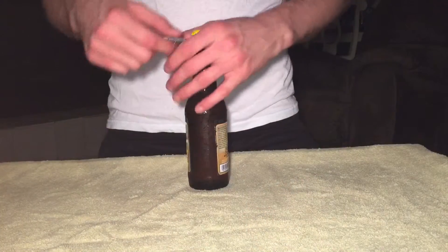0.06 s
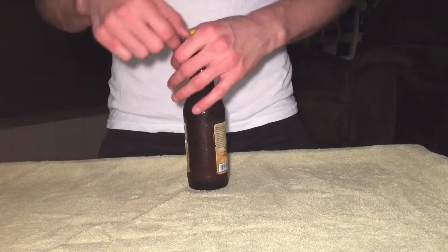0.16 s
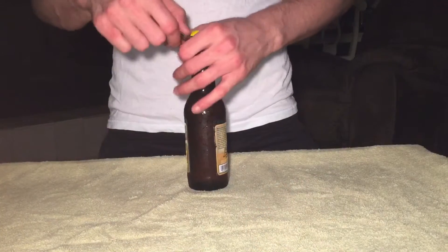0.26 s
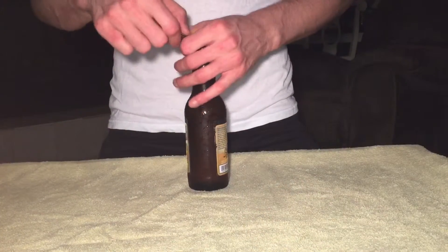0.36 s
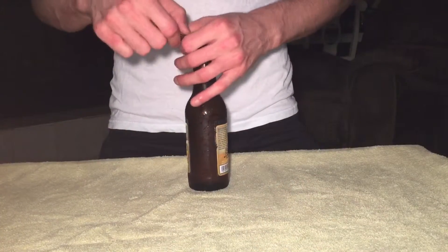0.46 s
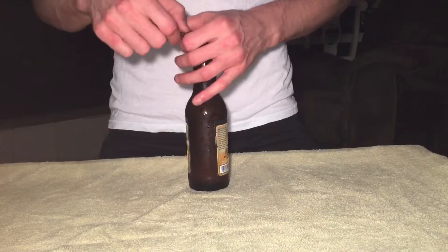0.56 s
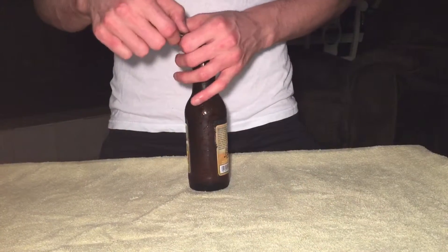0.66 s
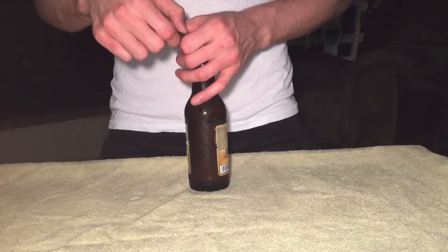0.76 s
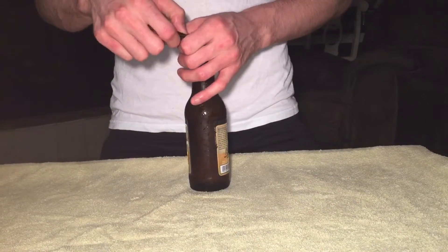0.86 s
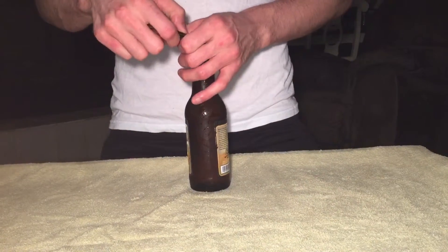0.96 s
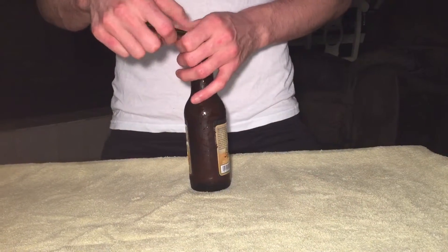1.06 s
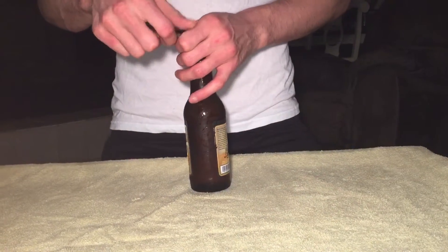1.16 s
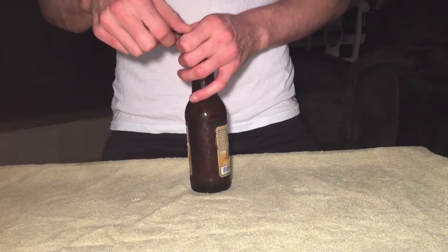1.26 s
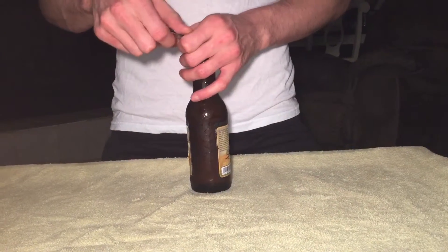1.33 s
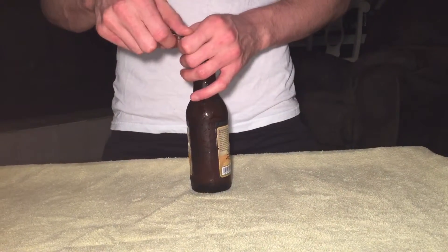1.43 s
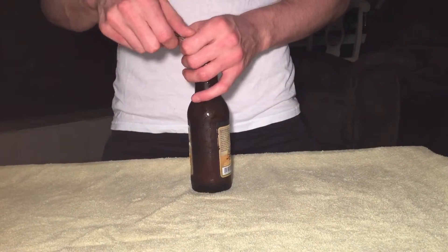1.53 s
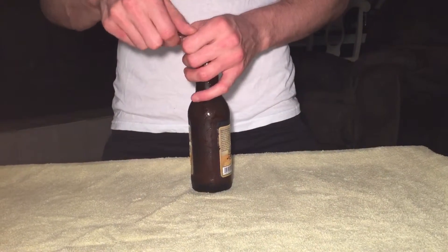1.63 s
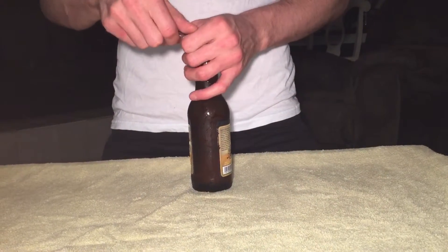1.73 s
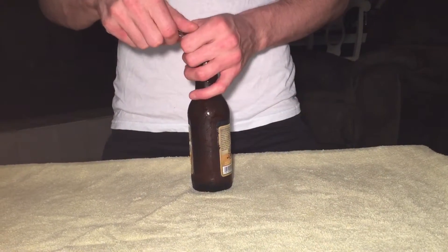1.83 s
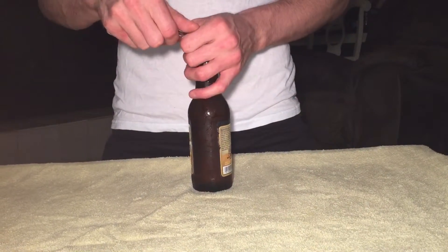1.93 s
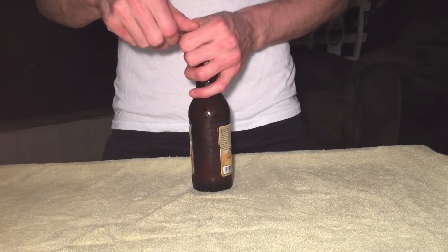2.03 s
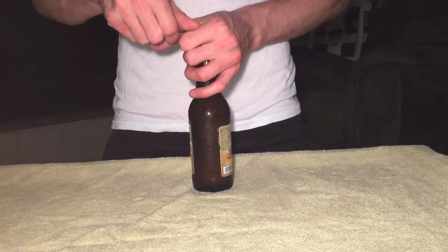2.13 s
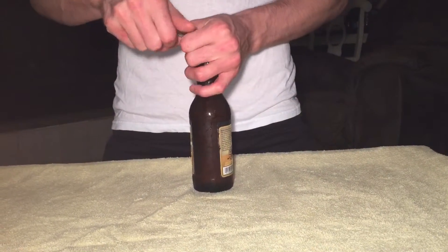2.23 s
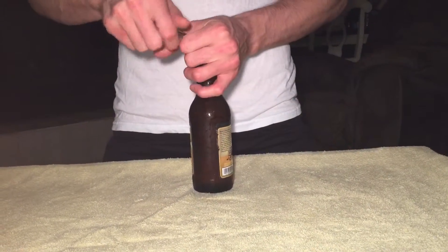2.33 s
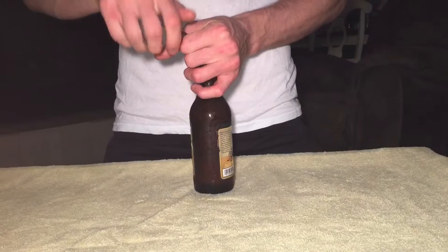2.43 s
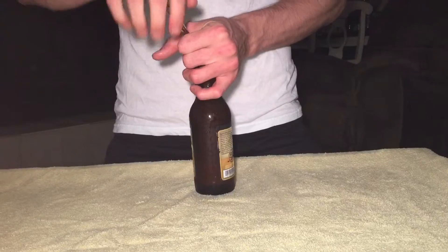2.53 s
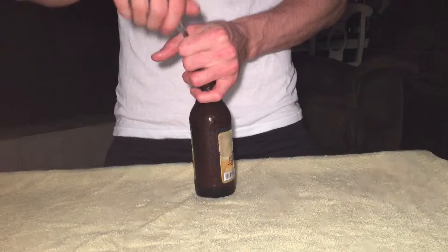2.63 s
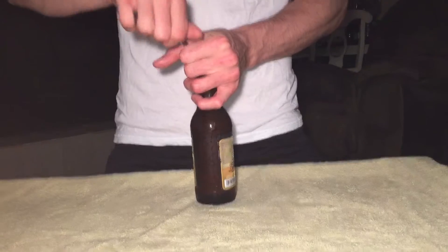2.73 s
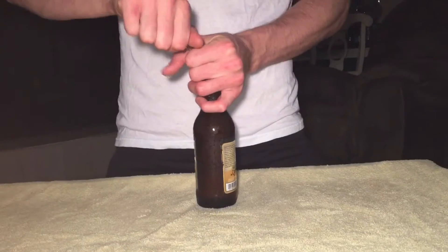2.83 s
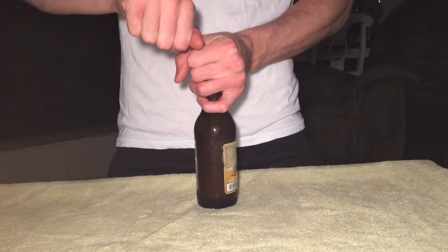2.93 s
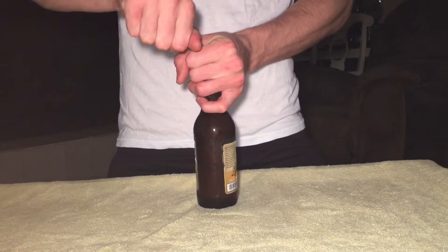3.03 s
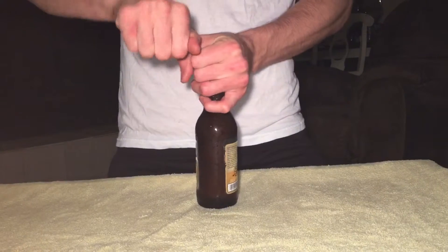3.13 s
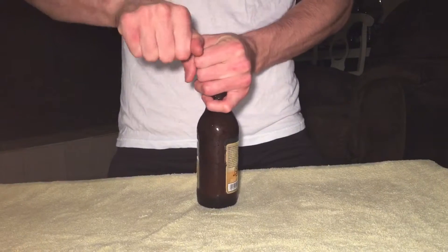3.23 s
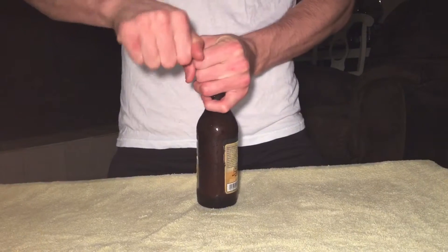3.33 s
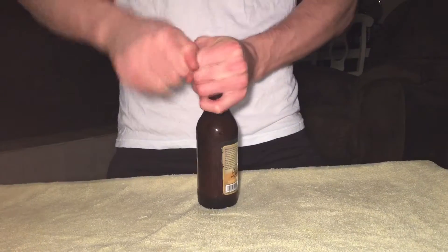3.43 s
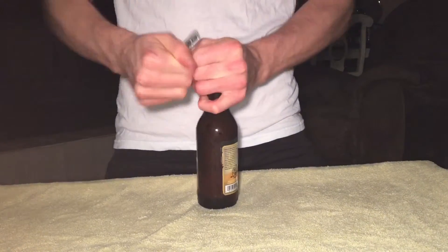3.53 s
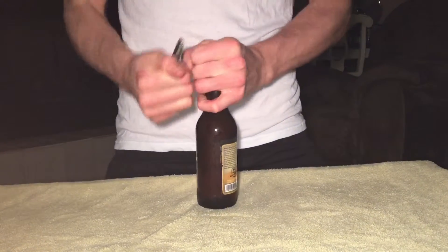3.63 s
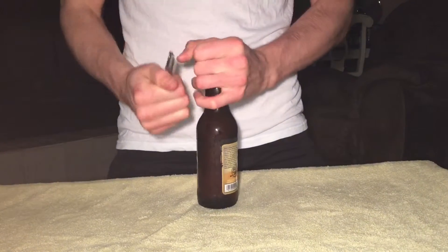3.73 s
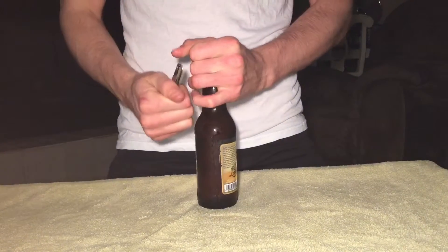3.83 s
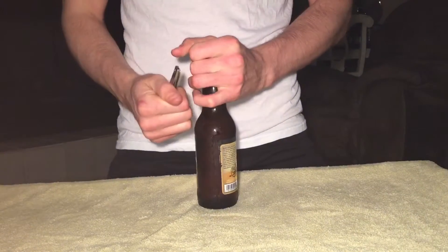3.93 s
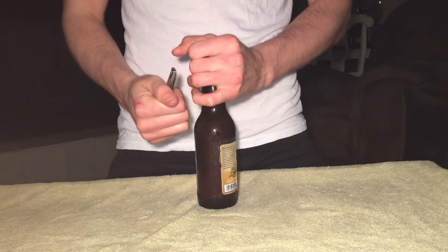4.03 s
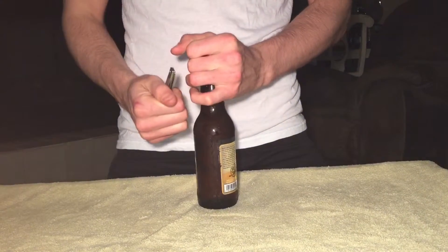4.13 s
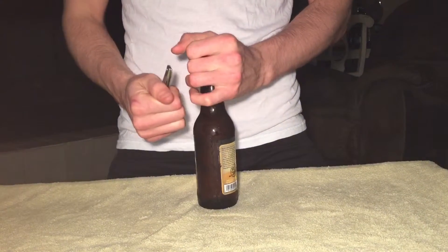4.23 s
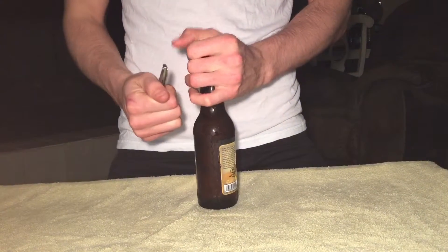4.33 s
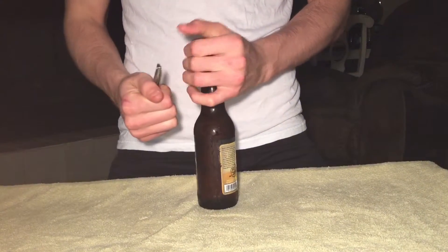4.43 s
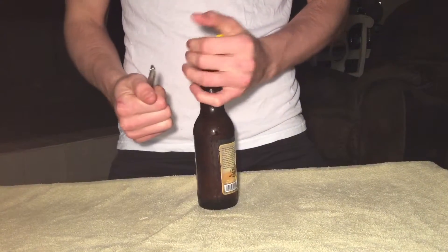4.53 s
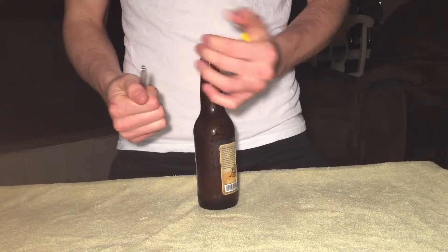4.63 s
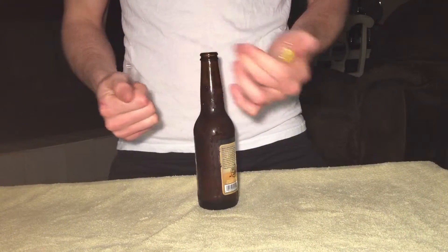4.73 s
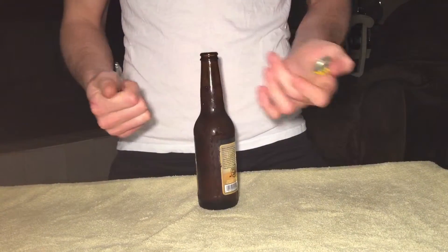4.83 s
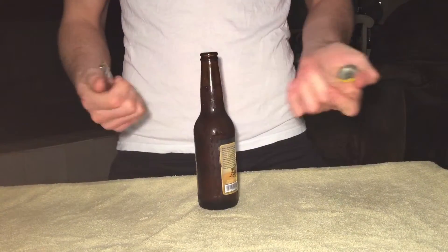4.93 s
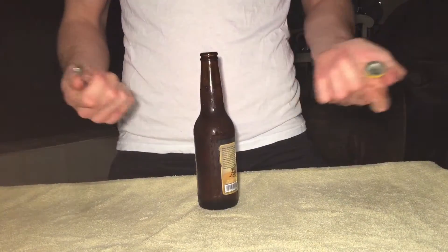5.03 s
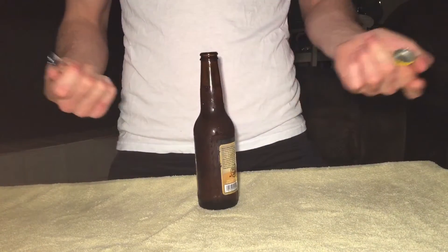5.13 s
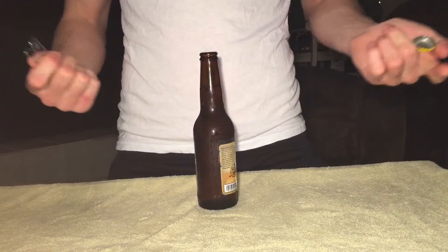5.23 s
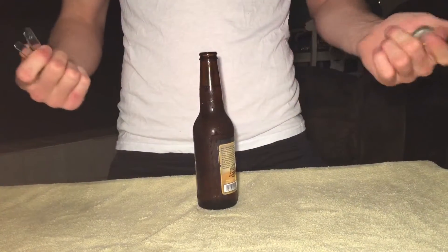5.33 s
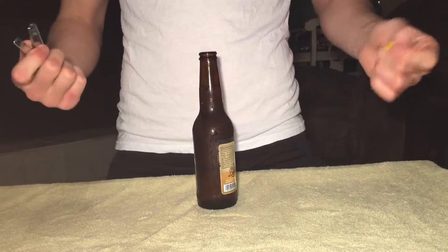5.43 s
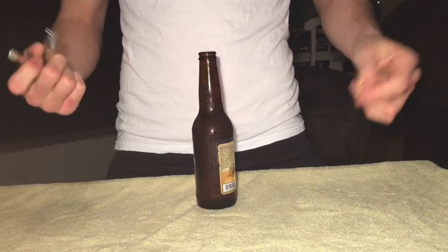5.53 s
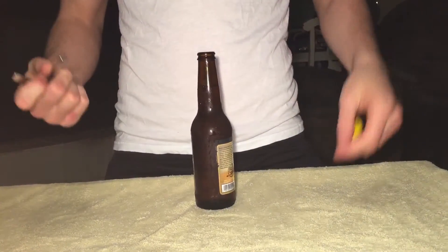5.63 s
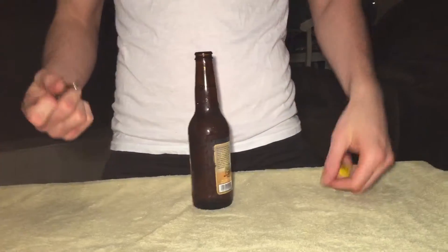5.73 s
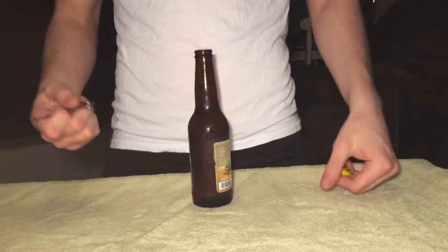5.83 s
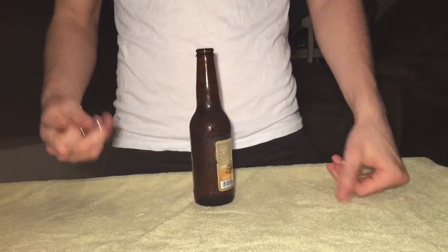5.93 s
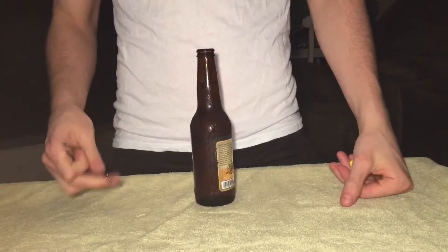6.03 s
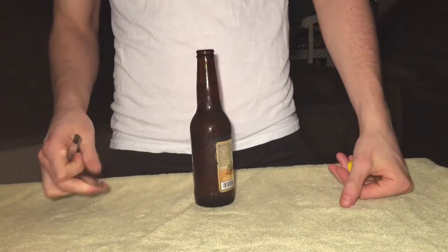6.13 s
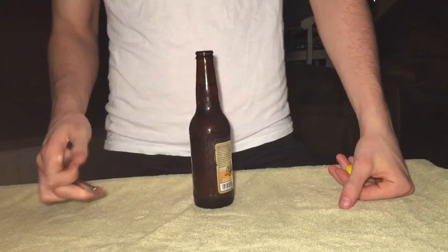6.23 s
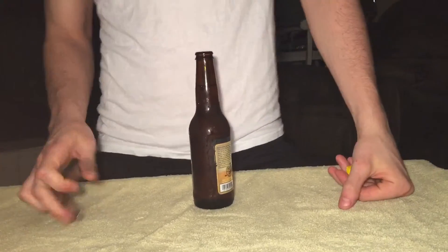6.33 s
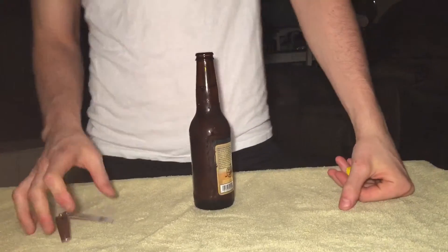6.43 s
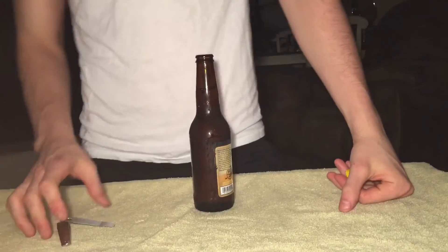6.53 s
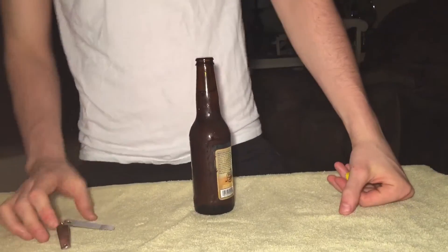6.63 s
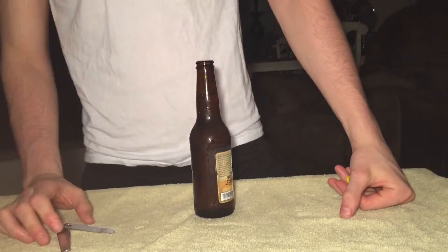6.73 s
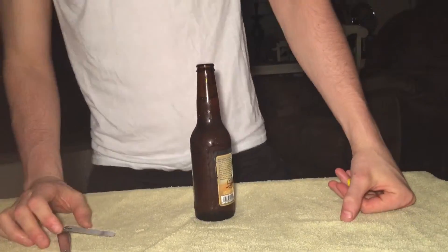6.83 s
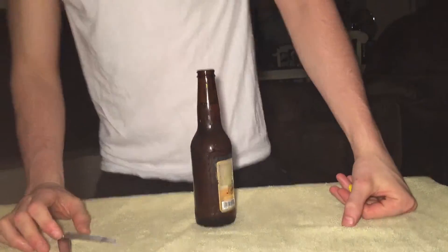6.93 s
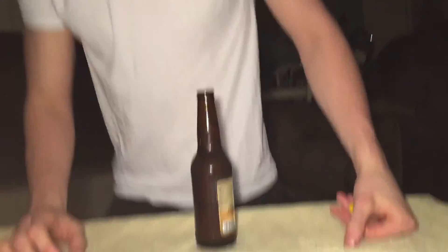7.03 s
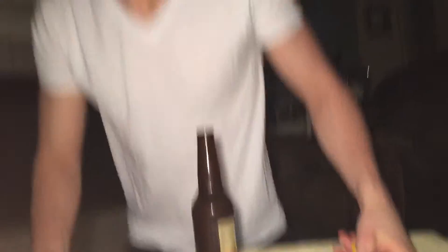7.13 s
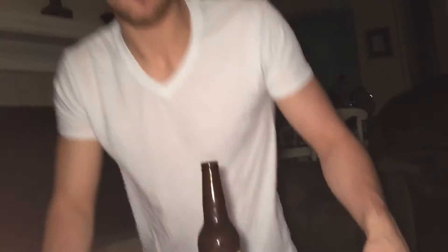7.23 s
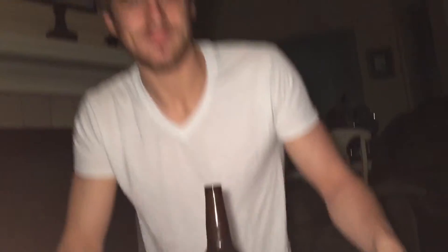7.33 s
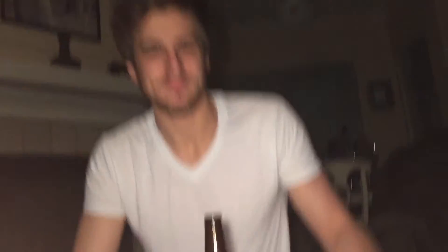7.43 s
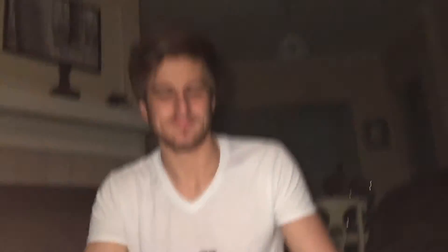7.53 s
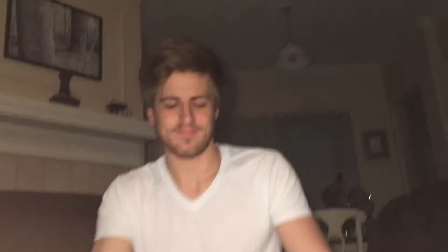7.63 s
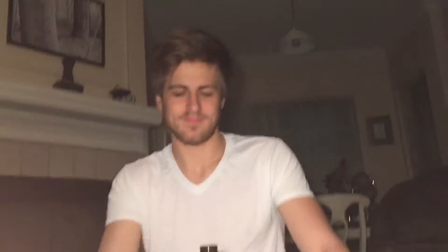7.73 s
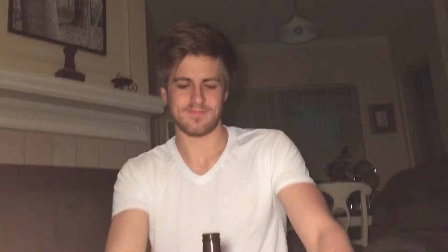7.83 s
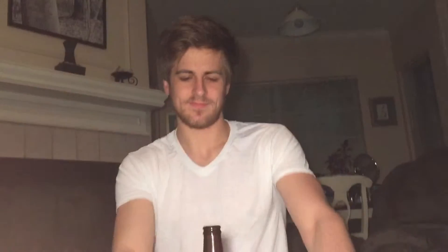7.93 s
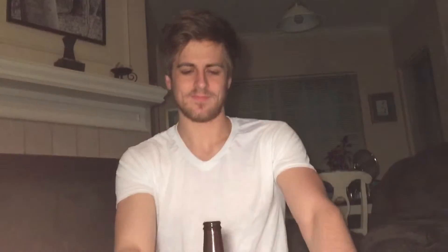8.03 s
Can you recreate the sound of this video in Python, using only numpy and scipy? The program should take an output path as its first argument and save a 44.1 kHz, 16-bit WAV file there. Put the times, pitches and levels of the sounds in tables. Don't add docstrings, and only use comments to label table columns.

```python
import sys
import numpy as np
from scipy import signal
from scipy.fft import rfft, irfft, next_fast_len
from scipy.io import wavfile
from scipy.ndimage import map_coordinates

SR = 44100
rng = np.random.default_rng(int(sys.argv[2]) if len(sys.argv) > 2 else 0)


def generate_wav(sig):
    pcm = np.round(np.clip(np.atleast_2d(sig).T, -1, 1) * 32767).astype(np.int16)
    wavfile.write(sys.argv[1], SR, pcm)


def gain_from_decibels(decibels):
    exponent = np.asarray(decibels, float) / 20
    return 10 ** exponent


N = 355645
LIFE = np.arange(SR // 4) / SR

# (frequency [Hz], rms level [dB], unsteadiness [dB])
HUM = [(58.7, -47, -1), (121, -60.5, 3.5), (179.5, -72, 4.5), (238.9, -84.5, 3.5), (290, -69, 6),
       (405, -75, 5.5), (470.5, -66.5, -0.5), (610, -85, 5.5)]
# (frequency [Hz], density [dB per Hz])
AIR_SPECTRUM = [(12, -34), (20, -6), (44, -8.5), (71, -9), (102, -11.5), (212, -20.5), (289, -18),
                (361, -24), (465, -22.5), (535, -26), (772, -32), (966, -32), (4930, -43.5), (15200, -50.5),
                (16500, -69)]
# (frequency [Hz], T60 [s])
ROOM_DECAY = [(150, 0.49), (1000, 0.44), (4000, 0.34), (9000, .27), (15000, 0.12)]
# (delay [s], level [dB])
ECHOES = [(.0045, -15), (.009, -21), (.014, -20), (.0205, -25), (.028, -26)]

# (time [s], peak level [dB], push length [s])
THUMPS = [(3.53, -11.5, 0.0034), (3.535, -14.5, 0.0033), (3.548, -12.5, 0.0031), (3.558, -15.5, 0.0062),
          (4.364, -49.5, 0.012), (5.809, -40.5, 0.0068), (5.874, -29, 0.0055), (5.938, -44.5, 0.0029),
          (6.042, -29.5, 0.007), (6.112, -50, .009), (6.208, -49, .01), (6.5319, -19.5, 0.00082),
          (6.5412, -12, 0.0016), (6.555, -27, 0.00096), (6.857, -34, 0.014), (7.5605, -27, 0.0044),
          (7.589, -34.5, 0.004), (7.609, -40, 0.005), (7.638, -33.5, 0.0036), (7.735, -37, 0.0069)]
# (frequency [Hz], level [dB], T60 [s])
TABLE_MODES = [(45, -17.5, .1), (87, -9, .15), (113.3, -7, 0.36), (151.5, -2.5, .1), (174.7, -9, 0.055),
               (217, -9.5, 0.06), (237.5, -7, .1), (366, -16.5, 0.23), (462, -19, .07),
               (598.6, -24.5, 0.055), (647, -28.5, .05), (945, -26.5, 0.046)]
# (time [s], peak level [dB])
THUDS = [
    (3.531, -31),
    (6.533, -39),
    (6.543, -32),
    (7.56, -49.5),
    (7.6, -47.5),
]
# (frequency [Hz], density [dB per Hz])
THUD_SPECTRUM = [(60, -32), (120, -7.5), (220, -4.5), (370, -1.5), (480, -2), (700, -14.5), (1200, -36.5)]
# (time [s], peak level [dB])
CREAKS = [(7.5662, -42.5), (7.579, -48), (7.675, -41), (7.6854, -39.5), (7.706, -53), (7.762, -44),
          (7.922, -44), (7.9295, -28.5), (7.9335, -34), (7.984, -35.5), (7.9985, -34), (8.0155, -37)]
# (frequency [Hz], density [dB per Hz])
CREAK_SPECTRUM = [(500, -37), (1200, -7.5), (2000, -0.5), (3000, -3), (4200, -8.5), (5500, -31),
                  (9000, -29), (14000, -41.5)]

# (time at full speed [s], level [dB], held [s])
SOFA_RUBS = [
    (7.69, -59, .004),
    (7.755, -59, .01),
    (7.87, -71, .19),
]
# (time at full speed [s], level [dB], held [s])
SLEEVE_RUBS = [
    (6.83, -61.5, 0.00984),
    (6.97, -67.5, .004),
    (7.05, -72, 0.27),
    (7.58, -59.5, 0.0037),
    (7.75, -66.5, .004),
]
# (frequency [Hz], density [dB per Hz])
SOFA_SPECTRUM = [(700, -13), (1500, 6.5), (3500, 4.5), (5000, 1), (7000, -1.5), (12000, -9), (16000, -12),
                 (17000, -59)]
# (frequency [Hz], density [dB per Hz])
SLEEVE_SPECTRUM = [(200, -25), (400, 2.5), (1000, 1.5), (2500, -4), (3500, -10.5), (6000, -14),
                   (12000, -43.5)]

# (time of fullest flow [s], level [dB], held [s])
LEAK = [
    (3.504, -33, .004),
]
# (frequency [Hz], density [dB per Hz])
GAS_SPECTRUM = [(590, -57.5), (1000, -27.5), (2810, 3), (3550, -3.5), (4180, -9), (4490, -11), (7260, -3.5),
                (9400, -2), (15000, -7), (15900, -11), (16500, -30.5)]

# (time [s], peak level [dB])
POPS = [
    (3.5284, -1),
    (3.5386, -8.5),
    (3.5467, -11),
]
# (time [s], peak level [dB])
CAP_SNAPS = [(.921, -56.5), (.935, -63), (1.034, -62), (1.042, -59), (1.0482, -52), (2.32, -46),
             (4.4294, -67), (4.477, -61), (5.2594, -63.5), (5.3093, -22), (5.3112, -10), (5.3133, -25),
             (5.6229, -48), (5.6594, -63), (5.7894, -65.5)]
# (time [s], peak level [dB])
DROPS = [
    (6.5315, -31.5),
    (6.535, -28),
    (6.542, -24),
    (6.5484, -32.5),
]
# (time [s], peak level [dB])
KNOCKS = [
    (.2583, -31),
    (.46, -46),
    (.6, -49),
    (1.2534, -42),
    (1.2604, -40.5),
    (6.5315, -25.5),
    (6.542, -29),
    (7.56, -49),
]
# (frequency [Hz], density [dB per Hz])
POP_SPECTRUM = [(500, -27), (750, -10.5), (1900, -21.5), (2700, -5), (3300, -3.5), (4100, -10),
                (6000, -11.5), (8000, -16.5), (9500, -18.5), (10500, -17), (11500, -21), (15400, -25.5),
                (16500, -44.5)]
CAP_SPECTRUM = [(900, -62), (1450, -19), (2000, -30), (3000, -13.5), (4000, -7.5), (5000, -15.5),
                (5800, -20), (6700, -3.5), (7600, -4), (8600, -12.5), (10400, -0.5), (15000, -2),
                (16500, -21.5)]
DROP_SPECTRUM = [(1470, -47), (2500, -15.5), (3950, -21), (5420, -12), (6350, -4), (7150, -19), (8370, -11),
                 (10300, -15.5), (11700, -6), (15500, -19.5), (16500, -33.5)]
KNOCK_SPECTRUM = [(300, -30), (600, 0), (950, -1), (1400, -4.5), (2200, -10.5), (3500, -34), (8000, -60.5)]

# (time [s], peak level [dB])
LEVER_TAPS = [
    (3.0817, -31),
]
# (frequency [Hz], level [dB], T60 [s])
LEVER_MODES = [(1854, -15, 0.16), (1910, -15, .1), (2720, -8, 0.0118), (3350, -0.5, 0.01),
               (3560, -5.5, 0.012), (3860, -14, 0.0103), (4653, -18, .035)]
# (time [s], peak level [dB])
JAW_TAPS = [
    (1.0412, -44.5),
]
# (frequency [Hz], level [dB], T60 [s])
JAW_MODES = [(3510, 3.5, 0.019), (3500, -3, 0.017)]
# (time [s], peak level [dB])
CROWN_TAPS = [
    (3.5285, -7),
    (3.538, -16),
    (3.546, -10.5),
]
# (frequency [Hz], level [dB], T60 [s])
CROWN_MODES = [(1103, -26.5, 0.25), (2780, -12.5, 0.008), (2753, -10.5, 0.022), (3020, -9, .012),
               (3180, -8.5, 0.03), (3250, -11, 0.021), (4730, -18, .025), (11330, -16.5, 0.023)]
# (time [s], peak level [dB])
LOOSE_TAPS = [
    (4.434, -48),
    (4.475, -52.5),
]
# (frequency [Hz], level [dB], T60 [s])
LOOSE_MODES = [(1062, -18, 0.21), (3360, 0, 0.075), (3270, -2, .06), (5470, -18, .02), (8450, -20, .02)]
# (time [s], peak level [dB])
UNCORK = [
    (3.529, -21),
]
# (frequency [Hz], level [dB], T60 [s])
HOLLOW_MODES = [(218, 0, 0.14), (172, -2.5, 0.16), (710, -19, 0.071), (881.6, -17.5, .06)]

# (frequency [Hz], level [dB], T60 [s])
NECK = [(1666, -35.5, 0.17), (1812, -32, 0.084), (2450, -27, 0.057), (2923, -6.5, 0.017),
        (3118, -8.5, 0.034), (3198, -1, .035), (3263, -7, 0.041), (3333, -5.5, .025), (3854, -16, 0.011),
        (4215, -25.5, .13)]
SHOULDER = [(1112, -23, .15), (4650, -0.5, 0.076), (4750, -7.5, 0.06)]
LIP = [(5260, -17, 0.27), (5890, -16, 0.36), (5930, -22, .1), (6300, 8, 0.075)]
HIGH = [(7590, -17, 0.13), (8370, -14, 0.027), (8790, -6.5, 0.073), (9250, -11, 0.027), (9520, -10, 0.079),
        (11200, -15.5, 0.021), (12510, -17, 0.042), (13800, -11, .02), (15000, -16, .02)]
# (time [s], neck level [dB], shoulder level [dB], lip level [dB], high-mode level [dB])
KNICKS = [
    (0.258, -8, -30.5, -24.5, -23.5),
    (.3558, -38, -30, -47, -35),
    (0.4594, -24, -39.5, -47, -38),
    (1.24, -53.5, -77.5, -68, -76),
]
TOUCHES = [(.298, -47, -51, -55, -62), (.325, -47, -67, -65, -48), (.585, -37, -70, -69, -65),
           (.5913, -31, -52, -49, -44), (0.7194, -39.5, -57.5, -70, -63), (.934, -59, -54, -67.5, -74.5),
           (1.103, -32.5, -47.5, -57, -54), (1.2067, -45, -76, -84, -75), (1.2534, -37, -57, -64, -61),
           (1.2601, -31.5, -46.5, -63, -62), (1.311, -57, -76, -83, -78),
           (1.6709, -26.5, -37.5, -42.5, -50.5), (1.859, -45.5, -48, -53.5, -53),
           (2.3199, -53, -58, -80, -54), (2.5989, -61, -75, -90, -71)]
SLIDES = [
    (.234, -54, -102, -76, -66),
    (0.6064, -30.5, -33.5, -36.5, -35),
    (.926, -40, -73, -71, -68.5),
    (1.222, -50, -65, -77, -80),
]
# (frequency [Hz], density [dB per Hz])
GRIT_SPECTRUM = [(700, -30), (1500, -11), (2500, -1), (5000, 0.5), (9000, -2), (11000, -5.5), (14500, -7.5),
                 (15800, -14), (16500, -46.5)]
# (frequency [Hz], density [dB per Hz])
CLATTER_SPECTRUM = [(900, -30), (1700, -20), (2500, -8), (3200, 7), (4000, -3.5), (5500, -10.5),
                    (7000, -19), (10000, -35)]


def unit(x):
    return x / np.sqrt(np.mean(x ** 2) + 1e-20)


def along(points, hz):
    f, v = np.transpose(points)
    return np.interp(np.log(hz + 1), np.log(f + 1), v)


def coloured(spectrum, size):
    fast = next_fast_len(size)
    gain = gain_from_decibels(along(spectrum, np.fft.rfftfreq(fast, 1 / SR)))
    noise = rfft(rng.standard_normal(fast))
    return unit(irfft(noise * gain, fast)[:size])


def wobble(rate):
    knots = rng.standard_normal(int(N * rate / SR) + 4)
    return map_coordinates(knots, [np.arange(N) * rate / SR])


def add(track, s, sound):
    part = track[round(s * SR):][:len(sound)]
    part += sound[:len(part)]


def ring(modes, scatter_db, rise=0):
    hz, db, t60 = np.transpose(modes)[:, :, None]
    chance = rng.standard_normal((len(modes), 3, 1))
    swell = np.clip(LIFE / (rise + 2.0 / hz), 0, 1)
    decay_db = 60 * np.maximum(LIFE - rise, 0) / t60
    envelope = swell * gain_from_decibels(db + scatter_db * chance[:, 0] - decay_db)
    pitch = hz * (1 + 0.0034 * chance[:, 1])
    phase = chance[:, 2] * np.clip(rise * 500 - 1, 0, 2)
    return np.sum(envelope * np.sin(2 * np.pi * pitch * LIFE + phase), axis=0)


def strokes(rows, swell_db, die_db):
    t = np.arange(N) / SR
    gain = np.zeros(N)
    for s, db, held in rows:
        before, after = np.maximum(s - t, 0), np.maximum(t - s - held, 0)
        gain += gain_from_decibels(db - swell_db * before - die_db * after)
    return gain


def snaps(events, spectrum, t60):
    out = np.zeros(N)
    onset = 1 - np.exp(-LIFE / .0003)
    for s, db in events:
        envelope = onset * gain_from_decibels(db - 4.5 - 60 * LIFE / t60)
        add(out, s, envelope * coloured(spectrum, len(LIFE)))
    return out


def background():
    t = np.arange(N) / SR
    hum = np.zeros(N)
    for hz, db, wander_db in HUM:
        level_db = db + 0.5 + 0.62 * wander_db * np.tanh(wobble(6.5))
        phase = 0.18 * wander_db * wobble(0.9)
        hum += gain_from_decibels(level_db) * np.sin(2 * np.pi * hz * t + phase)
    hiss = gain_from_decibels(-58.5 + 1.1 * wobble(2.5)) * coloured(AIR_SPECTRUM, N)
    return hum + hiss


def room(x, wet_db):
    out = x.copy()
    for s, db in ECHOES:
        add(out, s, gain_from_decibels(db) * x)
    for start in range(0, N, len(LIFE)):
        hz, t, z = signal.stft(rng.standard_normal(SR // 2), SR, nperseg=256)
        decay = gain_from_decibels(-60 * t / along(ROOM_DECAY, hz)[:, None])
        tail = signal.istft(z * decay, SR, nperseg=256)[1]
        wet = signal.fftconvolve(x[start:start + len(LIFE)], tail / np.linalg.norm(tail))
        add(out, start / SR + .012, gain_from_decibels(wet_db) * wet)
    return out


def furniture():
    even_push_s, harder_db, hardest_db = .0037, 9.5, 10
    out = np.zeros(N)
    for s, db, length in THUMPS:
        tilt_db = min(harder_db * np.log2(even_push_s / length), hardest_db)
        modes = [(hz, g + tilt_db * np.log2(hz / 170), t60) for hz, g, t60 in TABLE_MODES]
        push = np.sin(np.pi * np.clip(LIFE[:900] / max(length, 3e-4), 0, 1))
        response = signal.fftconvolve(ring(modes, scatter_db=4.0), push / push.sum())
        add(out, s, gain_from_decibels(db - 4.5) * response)
        add(out, s, -gain_from_decibels(db + 0.5) * push)
    deep_bass_cut = signal.butter(2, 75, "high", fs=SR, output="sos")
    return signal.sosfilt(deep_bass_cut, out)


def cloth():
    swell_db = 294.5
    sofa_grains = gain_from_decibels(2.1 * wobble(200) + 0.55 * wobble(40)) * coloured(SOFA_SPECTRUM, N)
    sleeve_grains = gain_from_decibels(3.2 * wobble(51)) * coloured(SLEEVE_SPECTRUM, N)
    sofa = strokes(SOFA_RUBS, swell_db, die_db=400.5) * unit(sofa_grains)
    sleeve = strokes(SLEEVE_RUBS, swell_db, die_db=133.5) * unit(sleeve_grains)
    return sofa + sleeve


def gas():
    opens_s = 3.44
    opening = np.clip((np.arange(N) / SR - opens_s) / .02, 0, 1)
    flow = opening * strokes(LEAK, swell_db=429.5, die_db=802)
    return flow * unit(gain_from_decibels(0.75 * wobble(230)) * coloured(GAS_SPECTRUM, N))


def metal_and_air():
    tap_s, slide_s = .0007, 0.0089
    out = np.zeros(N)
    for taps, modes, rise in ((LEVER_TAPS, LEVER_MODES, tap_s), (JAW_TAPS, JAW_MODES, tap_s),
                              (CROWN_TAPS, CROWN_MODES, tap_s), (LOOSE_TAPS, LOOSE_MODES, slide_s),
                              (UNCORK, HOLLOW_MODES, tap_s)):
        for s, db in taps:
            add(out, s, gain_from_decibels(db) * ring(modes, scatter_db=1.7, rise=rise))
    return out


def bottle():
    out = np.zeros(N)
    grip = gain_from_decibels(-8 / (1 + np.exp(-(LIFE - .032) / .002)))
    for contacts, length in ((KNICKS, .0009), (TOUCHES, 0.0029), (SLIDES, 0.0078)):
        swell = np.clip(LIFE / length, 0, 1)
        after = np.maximum(LIFE - length, 0)
        for s, *levels_db in contacts:
            glass = np.zeros(len(LIFE))
            for modes, db in zip((NECK, SHOULDER, LIP, HIGH), levels_db):
                glass += gain_from_decibels(db) * ring(modes, scatter_db=4.2, rise=length)
            grit = gain_from_decibels(levels_db[-1] - 4.5 - 60 * after / 0.022) * coloured(GRIT_SPECTRUM, len(LIFE))
            clatter = gain_from_decibels(levels_db[0] - 15.5 - 60 * after / 0.065) * coloured(CLATTER_SPECTRUM, len(LIFE))
            add(out, s, grip * glass + swell * (grit + clatter))
    return out


def scene():
    dry_snaps = (snaps(POPS, POP_SPECTRUM, t60=0.02) + snaps(CAP_SNAPS, CAP_SPECTRUM, t60=.012)
                 + snaps(DROPS, DROP_SPECTRUM, t60=.028) + snaps(KNOCKS, KNOCK_SPECTRUM, t60=0.027))
    soft = furniture() + snaps(THUDS, THUD_SPECTRUM, t60=.14) + snaps(CREAKS, CREAK_SPECTRUM, t60=0.012)
    ringing = room(bottle() + metal_and_air(), wet_db=-12.0)
    noisy = room(dry_snaps + gas() + cloth(), wet_db=-10.5)
    return (ringing + noisy + room(soft, wet_db=-15) + background())[None]


def roll_off(x):
    return signal.sosfilt(signal.butter(12, 16670, fs=SR, output="sos"), x)


def record(dry):
    bass_cut = signal.butter(4, 45, "high", fs=SR, output="sos")
    x = signal.sosfilt(bass_cut, dry)
    rounded = x / (1 + np.abs(x / 1.15) ** 4) ** .25
    return roll_off(rounded)


dry = scene()
out = record(dry)
generate_wav(out)
```